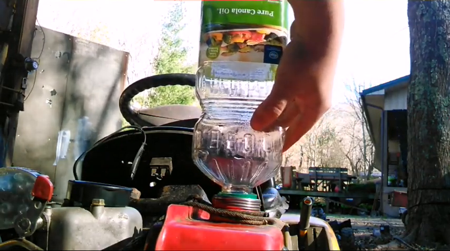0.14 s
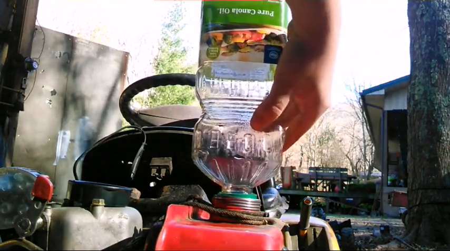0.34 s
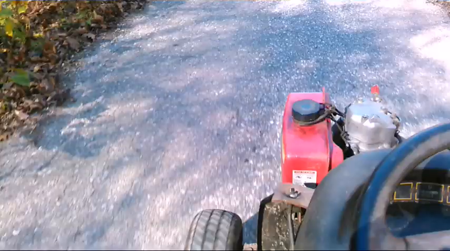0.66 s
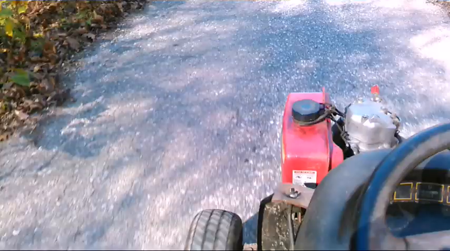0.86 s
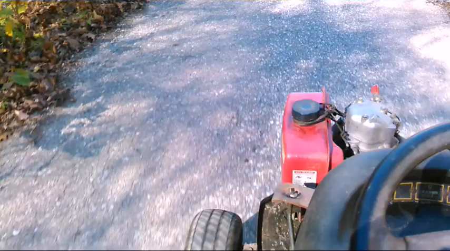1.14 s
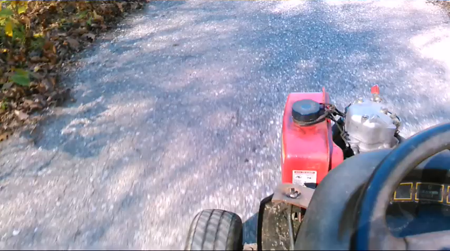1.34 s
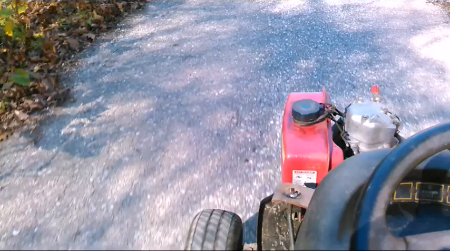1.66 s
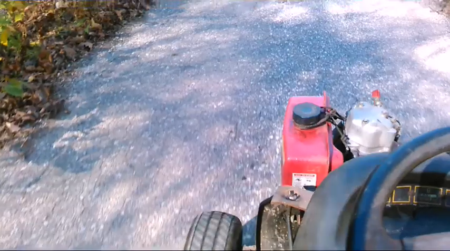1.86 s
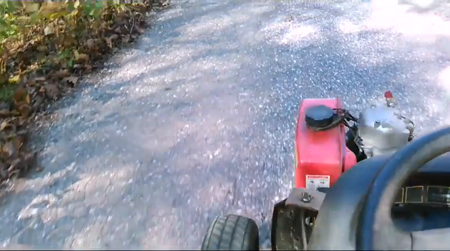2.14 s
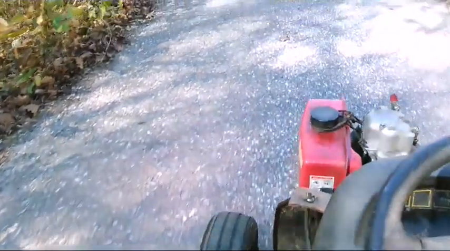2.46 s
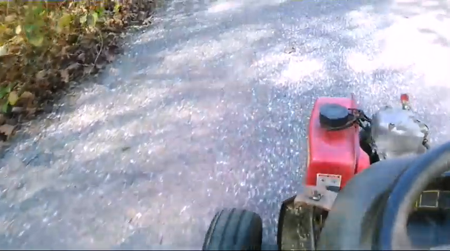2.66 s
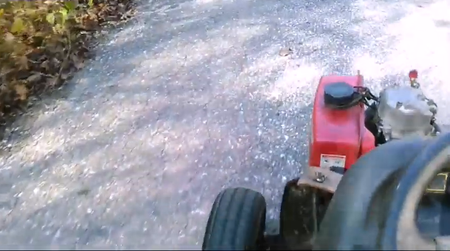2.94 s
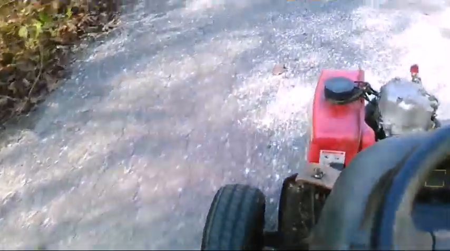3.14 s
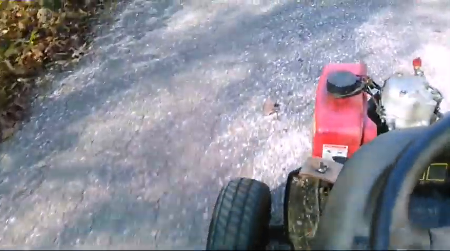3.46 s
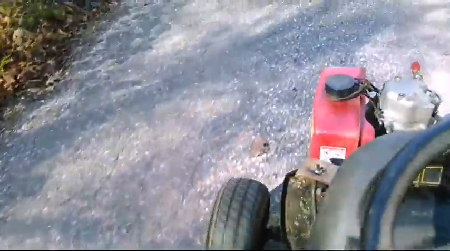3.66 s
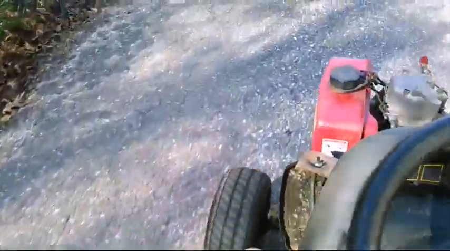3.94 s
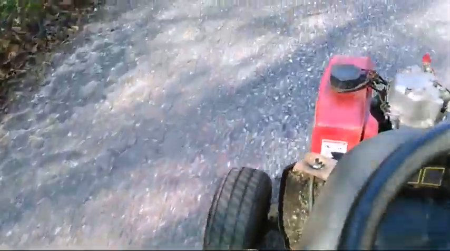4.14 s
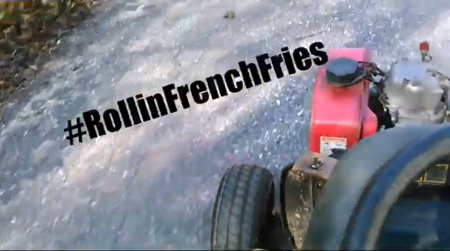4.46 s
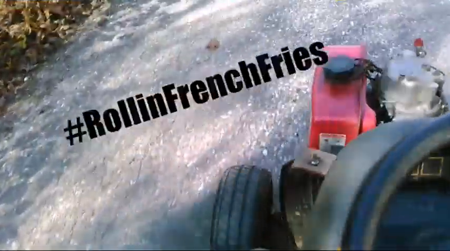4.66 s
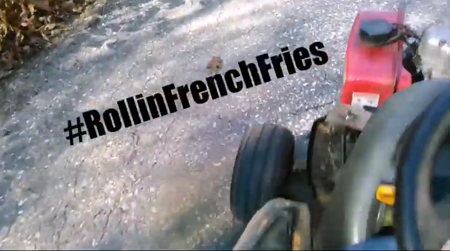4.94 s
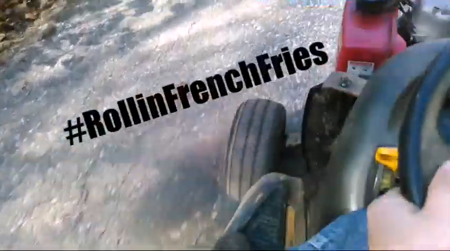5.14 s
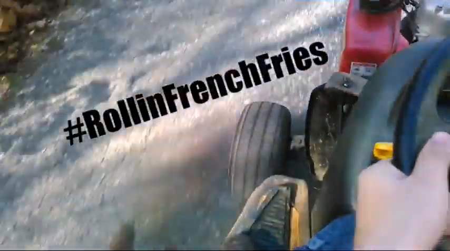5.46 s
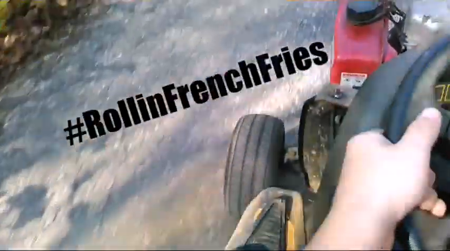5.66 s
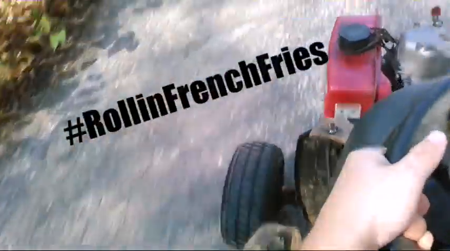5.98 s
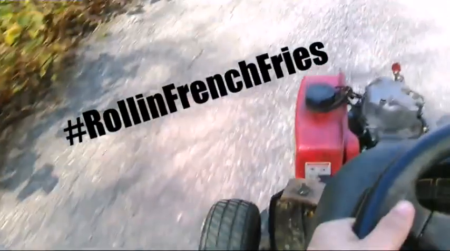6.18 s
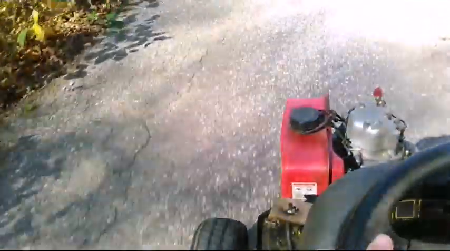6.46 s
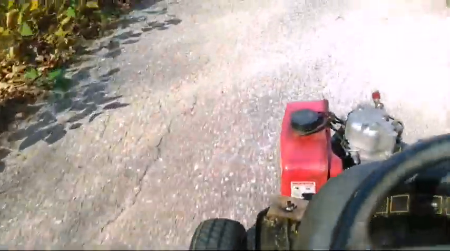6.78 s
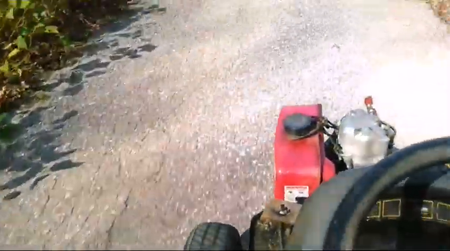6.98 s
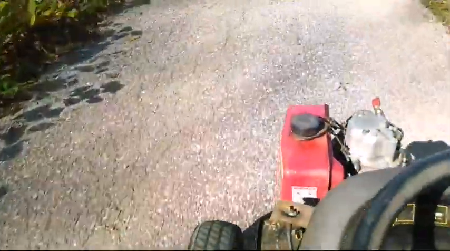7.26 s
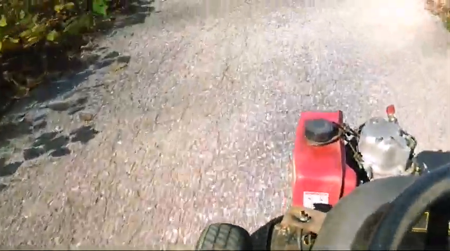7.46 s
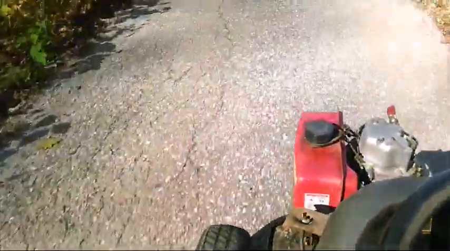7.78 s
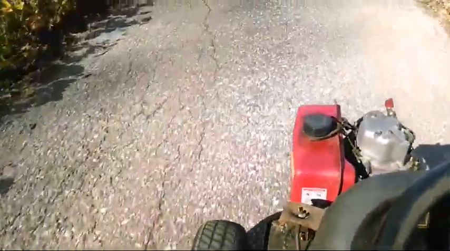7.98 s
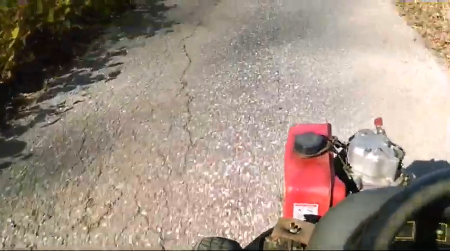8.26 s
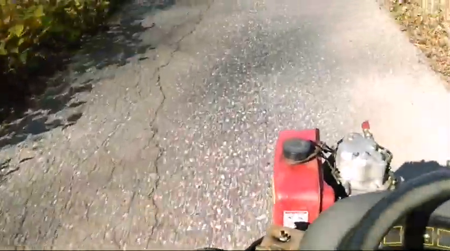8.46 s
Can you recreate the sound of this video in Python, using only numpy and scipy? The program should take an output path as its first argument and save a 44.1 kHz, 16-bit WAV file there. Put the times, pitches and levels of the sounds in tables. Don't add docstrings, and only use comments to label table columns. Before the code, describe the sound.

Very quiet handling of a plastic bottle on a fuel tank: soft thuds, rustle, crinkle, tiny taps. After a brief silence a single-cylinder diesel cuts in very loud, already idling with separate chugs and metallic clatter. It eases off for a moment, then pulls up with heavy knocking and settles into a fast, steady roar. Small overloaded microphone close to the engine outdoors, harsh and nearly mono.

```python
import sys
import numpy as np
from scipy import signal
from scipy.fft import rfft, irfft, next_fast_len
from scipy.io import wavfile
from scipy.ndimage import uniform_filter1d, map_coordinates

SR = 44100
rng = np.random.default_rng(int(sys.argv[2]) if len(sys.argv) > 2 else 0)


def inscribe(sig):
    pcm = np.round(np.clip(np.atleast_2d(sig).T, -1, 1) * 32767)
    wavfile.write(sys.argv[1], SR, pcm.astype(np.int16))


def magnitude_from_level(level_db):
    exponent = np.asarray(level_db, float) / 20
    return 10 ** exponent


N = 380141
CUT_S, START_S, PULL_S = .757, 1.1445, 3.25

# (time [s], hold [s], thud [dB], rustle [dB], crinkle [dB])
HAND_MOVES = [
    (.0, 0.0018, -46, -41, -61),
    (.02, .05, -45, -68, -85),
    (.1, 0.13, -66, -65, -92),
    (.27, .03, -60, -70, -93),
    (0.318, 0.11, -49, -68, -93),
    (0.491, .14, -60, -52.5, -77),
    (.64, 0.053, -57, -54.5, -63),
    (.72, .04, -51, -62, -66),
]
# (time [s], peak level [dB], pitch [Hz])
BOTTLE_TAPS = [(.001, -34, 130), (.001, -46, 3020), (.097, -51, 800), (.144, -51, 1100), (.309, -53, 912),
               (.487, -52, 900), (.519, -46, 536), (.574, -46, 576), (.641, -47, 4800), (.641, -46, 1500),
               (.699, -52, 3200), (.75, -46, 1310)]
# (frequency [Hz], level [dB per Hz])
RUSTLE_TONE = [(120, -30), (200, 3), (540, -3), (1000, -6), (1500, -13), (2500, -25), (4000, -39)]
# (time [s], rate [cycles per s])
ENGINE_SPEED = [(1.14, 15.423), (1.5, 15.542), (3.0, 15.585), (3.2, 15.318), (3.5, 18.485), (3.9, 22.804),
                (4.3, 26.14), (4.6, 28.327), (4.75, 27.855), (7.0, 27.791), (7.7, 27.881), (8.62, 27.733)]
# (time [s], load [0 coasting, 1 idling, 2 cruising, 3 pulling, 4 taking the load])
ENGINE_LOAD = [(1.14, 1.15), (2, 0.93), (2.75, 0.94), (2.88, 0.58), (3.22, 0.015), (3.26, 3.47), (3.6, 3.3),
               (4, 3.04), (4.5, 2.77), (4.65, 2.14), (6, 2.55), (7.9, 1.9), (8.1, 1.76), (8.62, 1.9)]
# (exhaust roar [dB], knock [dB], valve clatter [dB], rebuilt treble [dB])
LAYER_LEVELS = [
    (-19, -27.5, -16, -64),
    (-10.5, -19.5, -14.5, -66),
    (-12.5, -30, -14, -31),
    (-11, -16, -15, -28.5),
    (-18.5, -14, 0, -37.5),
]
GAS_SURGES = [(.33, -.3, .385, .255, -.65), (.375, .6, .43, .30, .8), (.42, -.7, .50, .40, -.55),
              (.50, .35, .59, .505, .75), (.625, -.6, .635, .55, -.65), (.66, .55, .70, .62, .55),
              (.885, -.45, .91, .84, -.6), (.93, .45, 1.0, .99, .25)]
# (multiple of cycle rate, idling [dB rms], under load [dB rms])
PULSE_ORDERS = [(1, -42, -24.5), (2, -29.5, -21.5), (3, -37.5, -27), (4, -24.5, -35.5), (5, -26, -24),
                (6, -20, -19.5), (7, -23.5, -17.5), (8, -28, -27), (9, -25.5, -24.5), (10, -25.5, -22.5),
                (11, -19, -31.5), (12, -24.5, -27.5), (13, -27, -25.5), (14, -26, -24), (15, -26.5, -25.5),
                (16, -29.5, -25.5), (17, -35.5, -32.5), (18, -25.5, -26), (19, -29.5, -26), (20, -51, -47),
                (21, -47, -44.5), (22, -36.5, -39), (23, -60, -39.5), (24, -47, -37.5), (25, -44, -45.5),
                (26, -37, -31.5), (27, -44, -34), (28, -35, -33.5)]
# (frequency [Hz], gain [dB])
PIPE_GAIN = [(16, 0), (32, -11), (71, 8.5), (148, -1), (310, 6.5), (423, 5.5), (526, -4), (800, 4.5)]
# (frequency [Hz], level [dB per Hz])
ROAR_TONE = [(60, -17), (200, -12), (420, -7), (580, -15), (775, -13.5), (1150, -19), (1350, -22),
             (2000, -25),
             (2880, -26), (4300, -19.5), (4960, -15), (5560, -11), (6400, -17.5), (7600, -29), (8300, -45)]
# (frequency [Hz], width [Hz], level [dB])
BLOCK_MODES = [(468, 190, -7.5), (742, 108, -1), (1085, 214, 1.5), (1327, 370, -12.5), (1766, 82, -9)]
# (frequency [Hz], width [Hz], level [dB])
VALVE_MODES = [(2426, 192, -13), (3530, 250, -15.5), (4290, 406, -6), (5568, 600, 3), (6190, 910, -14.5)]
# (place idling [cycle], place as the pull begins [cycle],
# place at full speed [cycle], half length [ms], level idling [dB], level under load [dB])
ROAR_BURSTS = [(.10, .10, 0.3, 18.3, 10, 11), (.30, 0.42, 0.53, 5.8, 10, 9.5), (.85, .95, 1, 4.0, 12.5, -2)]
KNOCK_BURSTS = [(.14, .105, .04, 4.0, -3, 3), (.2, .15, .17, 2.5, -6, 1), (.58, .59, .48, 1.5, -1, -3)]
VALVE_BURSTS = [(.74, .72, .70, 2.6, 1, 2.5), (.59, .37, .325, 1.0, -1, 1.5), (.88, .55, .56, .6, -1, -4),
                (.075, .10, .005, .9, 0, -1.5)]
# (multiple of cycle rate, level [dB])
GEAR_TONES = [(31, -20), (34, -25)]
# (frequency [Hz], share of moments empty [0-1])
HOLE_SHARES = [(1500, 0), (2100, .07), (3000, .1), (3800, .01), (6900, .01), (7400, .25), (8200, .6),
               (8700, .08), (12000, .05), (15500, .25)]
# (frequency [Hz], level [dB per Hz])
TREBLE_TONE = [(7600, -3), (8300, -12), (8930, -9), (11800, 0), (12600, -4), (13700, -9), (14000, -15),
               (15600, -22)]
# (low edge [Hz], high edge [Hz], share of frames filled [0-1])
TREBLE_BANDS = [(7700, 10300, .97), (10300, 12300, .95), (12300, 13400, .88), (13400, 14400, .7),
                (14400, 15600, .45)]
TREBLE_FILL = [(0, .5), (1, .6), (1.4, 1)]
# (frequency [Hz], level [dB rms])
TREBLE_WHISTLES = [(8463, -60), (8786, -44), (9130, -48.5), (9819, -41), (11800, -64), (12575, -45),
                   (13264, -56), (13954, -60), (14643, -64)]
# (frequency [Hz], side minus mid [dB])
STEREO_WIDTH = [(60, -55), (180, -54), (550, -48.5), (1650, -34.5), (4970, -39), (15000, -33.5)]
# (time [s], length [s], level [dB])
STEREO_FLICKERS = [(1.138, 2.1, 0), (3.248, .22, 1.5), (3.766, 0.059, 0), (4.837, .21, 2.5), (5.444, .2, 1),
                   (6.055, 0.17, 0), (6.363, .07, 3.5), (6.613, 0.065, -5), (6.973, .07, 2.5),
                   (7.86, 0.083, 2), (8.553, .07, 0)]


def rms_one(x):
    return x / np.sqrt(np.mean(x ** 2) + 1e-20)


def in_time(rows):
    time_s, *columns = np.transpose(rows)
    return [np.interp(np.arange(N) / SR, time_s, column) for column in columns]


def coloured(x, points):
    hz, db = np.transpose(points)
    size = next_fast_len(N, True)
    log_hz = np.log(np.arange(size // 2 + 1) * SR / size + 1)
    gain = magnitude_from_level(np.interp(log_hz, np.log(hz), db, left=-90, right=-90))
    return irfft(rfft(x, size) * gain, size)[..., :N]


def band(x, low_hz, high_hz):
    return signal.sosfilt(signal.butter(2, [low_hz, high_hz], "band", fs=SR, output="sos"), x)


def resonances(x, modes):
    out = 0
    for k, (hz, width_hz, db) in enumerate(modes):
        r = np.exp(-np.pi * width_hz / SR)
        top = [1 - r * r, 0, r * r - 1]
        bottom = [2, -4 * r * np.cos(2 * np.pi * hz / SR), 2 * r * r]
        rung = x[k % len(x)]
        for _ in range(2):
            rung = signal.lfilter(top, bottom, rung)
        out = out + magnitude_from_level(db) * rung
    return rms_one(out)


def hand_levels():
    grip_db_per_s, let_go_db_per_s = 1500, 500
    t = np.arange(SR) / SR
    out = np.full((3, N), -120.)
    for s, hold, *db in HAND_MOVES:
        loss = grip_db_per_s * np.maximum(s - t, 0) + let_go_db_per_s * np.maximum(t - s - hold, 0)
        out[:, :SR] = np.maximum(out[:, :SR], np.array(db)[:, None] - loss)
    return out


def bottle():
    thud_db, rustle_db, crinkle_db = hand_levels()
    noise = rng.standard_normal((3, N))
    out = magnitude_from_level(thud_db) * resonances(noise[:1], [(67.6, 17, 19), (120, 60, -4)])
    out += (magnitude_from_level(rustle_db - 1.0) + magnitude_from_level(-71.5)) * rms_one(coloured(noise[1], RUSTLE_TONE))
    out += (magnitude_from_level(crinkle_db) + magnitude_from_level(-93)) * rms_one(band(noise[2], 2000, 6000))
    t = np.arange(5000) / SR
    for s, db, hz in BOTTLE_TAPS:
        i = round(s * SR)
        fade_s = .015 + 18 / hz
        out[i:i + len(t)] += magnitude_from_level(db - 60 * t / fade_s) * np.sin(2 * np.pi * hz * t)
    after_s = np.arange(N) / SR - CUT_S
    return out * magnitude_from_level(-np.clip(25 + 700 * after_s, 0, 200) * (after_s > 0))


def crank():
    rate, = in_time(ENGINE_SPEED)
    t = np.arange(N) / SR
    cycles = np.cumsum(rate * (t >= ENGINE_SPEED[0][0])) / SR
    stage = np.where(t < PULL_S, 0, 1 + np.clip((rate - 16) / 12, 0, 1))
    return cycles, rate, stage


def layer_levels():
    load, = in_time(ENGINE_LOAD)
    return [np.interp(load, np.arange(len(LAYER_LEVELS)), c) for c in np.transpose(LAYER_LEVELS)]


def gas_pulses(cycles, rate, stage):
    shiver, uneven_db, begun_weaker_db = 0.0031, 2.0, 5
    count = int(cycles[-1]) + 2
    at = np.minimum(np.searchsorted(cycles, np.arange(count) + .5), N - 1)
    pull = stage[at]
    orders, pipe = np.array(PULSE_ORDERS), np.array(PIPE_GAIN)
    k = np.arange(1, len(orders) + 1)
    timing = 0
    late = shiver * rng.standard_normal((count, 1))
    for idle, idle_height, begun, full, height in GAS_SURGES:
        place = np.interp(pull, [0, 1, 2], [idle, begun, full])[:, None] + late
        heights = np.where(pull < 1, idle_height, height)[:, None]
        timing = timing + heights * np.exp(-2j * np.pi * k * place)
    pipe_db = np.interp(np.log(np.outer(rate[at], k)), np.log(pipe[:, 0]), pipe[:, 1])
    load_db = orders[:, 2] + pipe_db - begun_weaker_db * (2 - pull[:, None])
    level_db = np.where(pull[:, None] < 1, orders[:, 1], load_db)
    level_db += uneven_db * rng.standard_normal(level_db.shape)
    spectrum = np.zeros((count, 513), complex)
    spectrum[:, k] = timing / abs(timing) * magnitude_from_level(level_db) * 512 * np.sqrt(2)
    waves = irfft(spectrum, 1024)
    waves = np.hstack([waves, waves[:, :1]])
    return map_coordinates(waves, [np.maximum(cycles - .5, 0), cycles % 1 * 1024], order=1)


def bursts(gates, cycles, rate, stage, floor_db, uneven_db):
    power = magnitude_from_level(floor_db) ** 2
    for idle, begun, full, ms, idle_db, load_db in gates:
        place = np.interp(stage, [0, 1, 2], [idle, begun, full])
        strength = rng.standard_normal(int(cycles[-1]) + 3)[(cycles - place + 1.5).astype(int)]
        level = magnitude_from_level(np.where(stage < 1, idle_db, load_db) + uneven_db * strength)
        away = (cycles - place + .5) % 1 - .5
        power = power + level ** 2 * np.exp(-(away / rate * 1000 / ms) ** 2 / 2)
    return rms_one(np.sqrt(power))


def blows(gate, cycles, rate, stage):
    passed = np.floor(cycles - np.interp(stage, [0, 1, 2], gate[:3]))
    return rms_one((np.diff(np.maximum.accumulate(passed), prepend=0) > 0) * 1.)


def exhaust_roar(turning):
    gusts = rng.standard_normal(N) * bursts(ROAR_BURSTS, *turning, floor_db=-16, uneven_db=1.0)
    return rms_one(coloured(gusts, ROAR_TONE))


def combustion_knock(turning, knock_db):
    firing = rng.standard_normal((2, N)) * bursts(KNOCK_BURSTS, *turning, floor_db=-10.5, uneven_db=0.8)
    blow_db = np.clip(knock_db + 14, -20, 0) + .7 * (turning[1] - 20)
    firing += magnitude_from_level(blow_db) * blows(KNOCK_BURSTS[0], *turning)
    return resonances(firing, BLOCK_MODES)


def valve_clatter(turning):
    seating = rng.standard_normal((3, N)) * bursts(VALVE_BURSTS, *turning, floor_db=-22, uneven_db=2.6)
    seating += magnitude_from_level(-15) * blows(VALVE_BURSTS[0], *turning)
    return resonances(seating, VALVE_MODES)


def injector_tick(turning):
    return magnitude_from_level(-33) * rms_one(band(blows(VALVE_BURSTS[1], *turning), 5800, 7200))


def gears(cycles):
    load, = in_time(ENGINE_LOAD)
    teeth = sum(magnitude_from_level(db) * np.sin(2 * np.pi * k * cycles) for k, db in GEAR_TONES)
    return band(teeth * magnitude_from_level(28 * (np.minimum(load, 3) - 3)), 660, 960)


def engine():
    turning = crank()
    roar_db, knock_db, clatter_db, _ = layer_levels()
    mix = magnitude_from_level(1.48) * gas_pulses(*turning)
    mix += magnitude_from_level(roar_db) * exhaust_roar(turning)
    mix += magnitude_from_level(knock_db) * combustion_knock(turning, knock_db)
    mix += magnitude_from_level(clatter_db) * valve_clatter(turning)
    mix += injector_tick(turning) + gears(turning[0])
    return mix * (np.arange(N) >= START_S * SR)


def scene():
    return np.tile(bottle() + engine(), (2, 1))


def rebuilt_treble(x):
    top_db = layer_levels()[3]
    frame = np.arange(N) // 1024
    frames = frame[-1] + 1
    strength = uniform_filter1d(band(x, 3400, 7000) ** 2, size=300).clip(0)
    follow = rms_one(np.sqrt(strength))
    spectrum = rfft(coloured(rng.standard_normal(N), TREBLE_TONE), 2 ** 19)
    hz_axis = np.arange(2 ** 18 + 1) * SR / 2 ** 19
    shared = uniform_filter1d(rng.standard_normal(frames), size=6)
    stage = crank()[2][::1024]
    fill = np.interp(stage, *np.transpose(TREBLE_FILL))
    out = 0
    for low_hz, high_hz, share in TREBLE_BANDS:
        chance = shared + uniform_filter1d(rng.standard_normal(frames), size=3)
        gain = (chance <= np.quantile(chance, fill * share)) * magnitude_from_level(2.5 * rng.standard_normal(frames))
        gain *= magnitude_from_level(9 * (stage < 1) * (low_hz == TREBLE_BANDS[0][0]))
        part = irfft(spectrum * (hz_axis > low_hz) * (hz_axis <= high_hz))[:N]
        out = out + uniform_filter1d(gain[frame], size=700) * part
    out = magnitude_from_level(top_db - 0.5) * follow ** 0.84 * rms_one(out)
    t = np.arange(N) / SR
    loaded = np.arange(N) > PULL_S * SR
    for hz, db in TREBLE_WHISTLES:
        on = uniform_filter1d(rng.standard_normal(frames), size=5) > .12
        on = uniform_filter1d(on[frame] * 1., size=512)
        present = np.where(loaded, 1, magnitude_from_level(-14) * (hz < 10000))
        out += magnitude_from_level(db + 6.5) * present * on * np.sin(2 * np.pi * hz * t)
    return out * (np.arange(N) >= START_S * SR)


def empty_weak_bands(x):
    hz, _, cells = signal.stft(x, SR, nperseg=2048)
    power = (abs(cells[:1024]) ** 2).reshape(128, 8, -1).mean(axis=1)
    local = np.exp(uniform_filter1d(np.log(power + 1e-14), size=9, axis=1))
    power = uniform_filter1d(power / local, size=3, axis=1)
    rank = power.argsort(axis=1).argsort(axis=1) / power.shape[1]
    share = np.interp(hz[4:1024:8], *np.transpose(HOLE_SHARES))
    cells[:1024] *= np.where(rank < share[:, None], .03, 1).repeat(8, axis=0)
    return signal.istft(cells, SR, nperseg=2048)[1][:len(x)]


def stereo_flicker():
    t = np.arange(N) / SR
    on = sum(magnitude_from_level(db) * (t >= s) * (t < s + length) for s, length, db in STEREO_FLICKERS)
    sign = rng.choice([-1, 1, -.3, .3], N // 1024 + 2).repeat(1024)[725:N + 725]
    return uniform_filter1d(on * sign, size=256)


def low_pass(x):
    return signal.sosfilt(signal.butter(12, 15600, fs=SR, output="sos"), x)


def record(dry):
    squashed = dry[0] / (1 + abs(dry[0] / 0.9) ** 2.78) ** (1 / 3.09)
    mid = signal.sosfilt(signal.cheby2(12, 55, 8200, fs=SR, output="sos"), squashed)
    mid = mid + rebuilt_treble(mid)
    start = round(START_S * SR)
    mid[start:] = empty_weak_bands(mid[start:])
    width = [(20, STEREO_WIDTH[0][1])] + list(STEREO_WIDTH) + [(20000, STEREO_WIDTH[-1][1])]
    side = magnitude_from_level(19) * coloured(mid * stereo_flicker(), width)
    mix = np.clip([mid + side, mid - side], -1.01, 1.01)
    return low_pass(mix)


dry = scene()
out = record(dry)
inscribe(out)
```